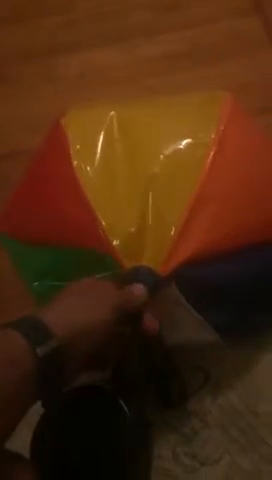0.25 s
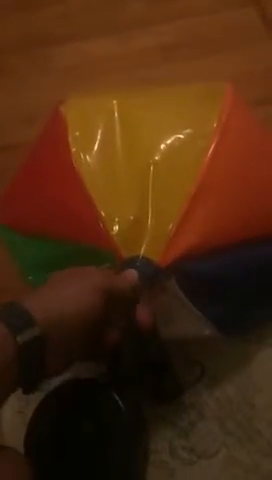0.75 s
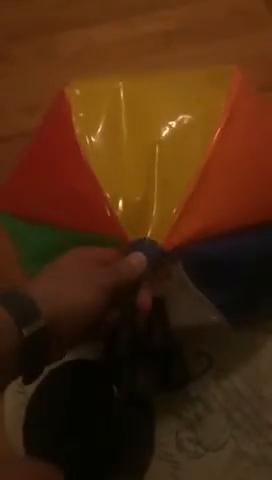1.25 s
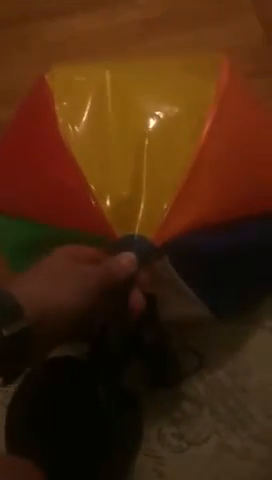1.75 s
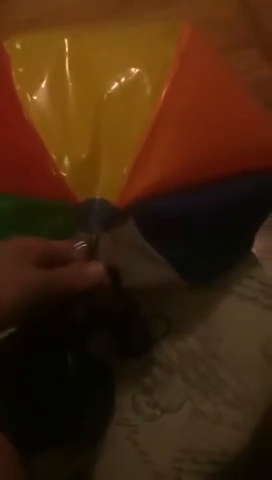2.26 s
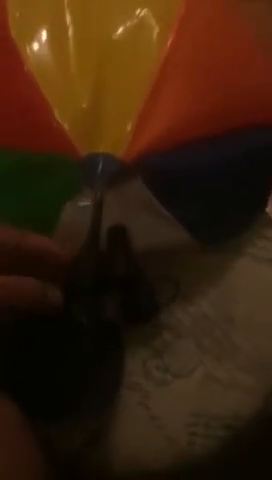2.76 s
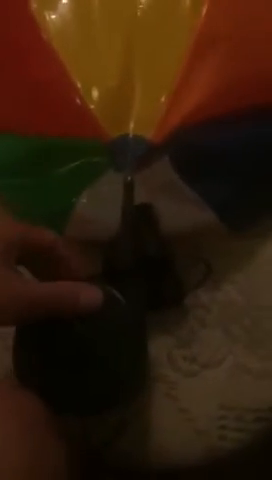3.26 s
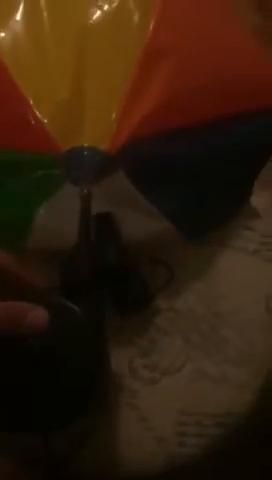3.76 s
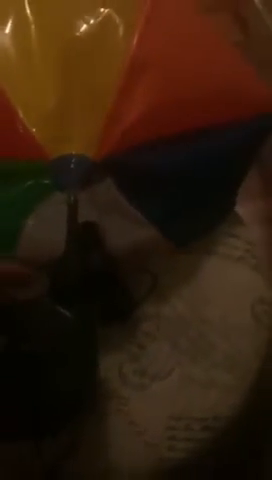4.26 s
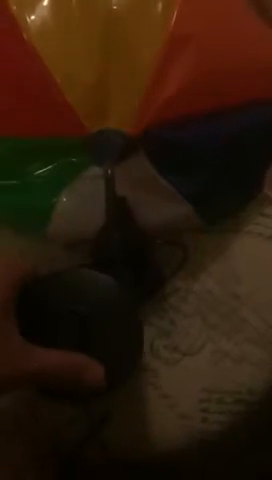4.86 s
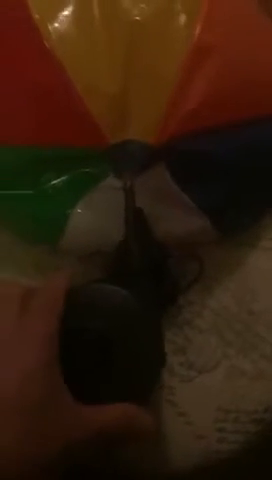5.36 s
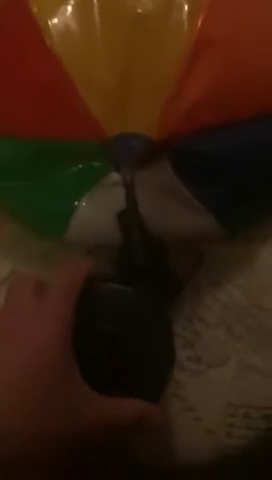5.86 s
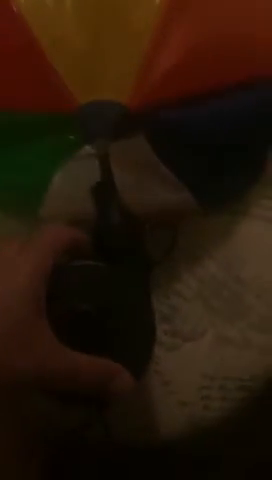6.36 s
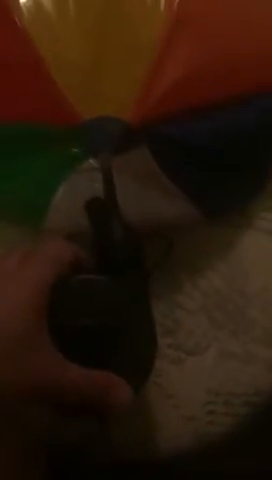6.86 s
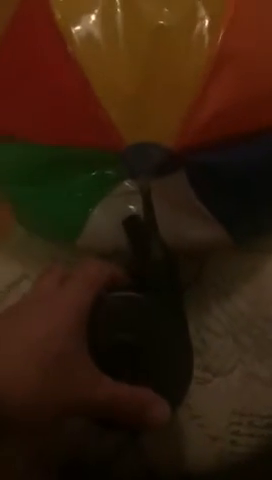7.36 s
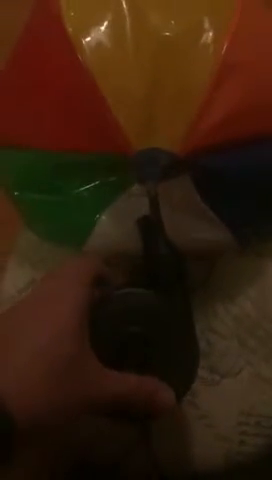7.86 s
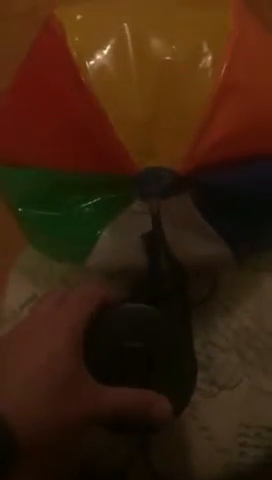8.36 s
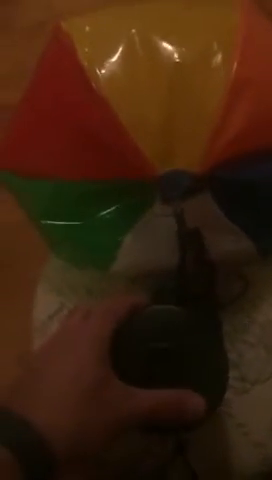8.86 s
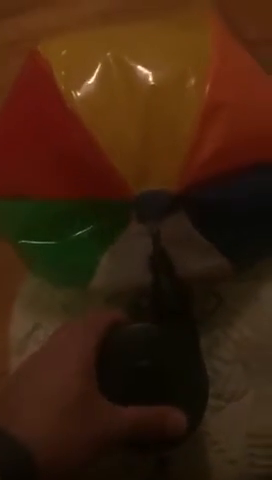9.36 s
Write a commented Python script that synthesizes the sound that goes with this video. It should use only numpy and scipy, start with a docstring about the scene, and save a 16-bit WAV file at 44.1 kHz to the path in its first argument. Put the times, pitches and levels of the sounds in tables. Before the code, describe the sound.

An electric air pump runs from the start, close by in a quiet room, inflating a beach ball. A steady, slightly hollow rush of air and hiss carries a motor hum and a piercing high whine that wavers in loudness. From about 5.5 seconds a hand rubs the case, with several dull bumps between 6.1 and 7.1 seconds. At about 6.8 seconds the pump cuts out and coasts down: the whine glides lower, the air fades, and the case briefly shudders against the floor. Faint falling chirps, a soft scrape and a low groan follow as the rotor slows, becoming very quiet by 9 seconds. At about 9.4 seconds the switch snaps on with a loud, slightly distorted plastic crack, and the motor hums and spins up, its pitch and the rush of air rising.

```python
"""A mains air pump blows up a vinyl beach ball, its 15-blade impeller whining over the rush of air
in the housing. It stands on the floor of a quiet room, with one microphone close by.
A hand grips the pump and switches it off; the rotor coasts down, shaking the case, chirping and
groaning as it slows. The switch snaps on again, overloading the recorder; the motor hums and spins up."""
import sys
import numpy as np
from scipy import signal
from scipy.fft import rfft, irfft
from scipy.io import wavfile
from scipy.ndimage import uniform_filter1d

SR = 44100
rng = np.random.default_rng(int(sys.argv[2]) if len(sys.argv) > 2 else 0)


def unload_wav(signal):
    """Save mono or channel-first audio to the path in sys.argv[1] as 16-bit WAV at rate SR, clipped to [-1, 1]."""
    wavfile.write(
        sys.argv[1],
        SR,
        np.round(np.clip(np.atleast_2d(signal).T, -1, 1) * 32767).astype(np.int16),
    )


N = 423801
TIME = np.arange(N) / SR
FREQS = np.maximum(np.arange(N // 2 + 1) * SR / N, 1)
OFF_S, ON_S = 6.755, 9.361
BLADES, MAINS_HZ = 15, 60

# spectrum of the quiet room: freq_hz, level_db
ROOM_SPECTRUM = [(18, -36.5), (30, -5.5), (71, 0.5), (175, -10), (270, -1.5), (326, -14), (1500, -13.5),
                 (1730, -15), (7990, -24.5), (9000, -21.5), (11700, -54.5), (19800, -120)]
# the palm rubbing the case: start_s, end_s, level_db
PALM_RUBS = [(5.45, 6.0, -59), (6.12, 6.578, -47), (6.65, 7.15, -48.5), (7.15, 7.65, -55), (7.65, 8.3, -67)]
# the hand bumping the case: start_s, level_db
HAND_BUMPS = [(1.219, -36), (3.529, -40), (5.668, -42), (6.132, -29), (6.239, -25), (6.390, -21),
              (6.502, -23), (6.534, -30), (6.676, -36), (6.796, -17.5), (6.878, -42), (6.964, -28),
              (7.099, -27), (7.325, -40), (7.405, -41), (7.548, -37), (7.612, -45), (9.169, -53),
              (9.222, -59), (9.358, -29.5)]
# thud of the case on the floor: pitch_hz, level_db, t60_s
THUD_MODES = [(55, -9, .1), (88, -1.5, 0.073), (140, -6.5, 0.061), (227, -3, .05), (330, -15.5, .04),
              (580, -6.5, .035)]
# the rocker switch is touched, snaps over and bounces: start_s, level_db
SWITCH_CONTACTS = [(9.168, -55), (9.3612, -0.5), (9.3628, -13), (9.3643, -11), (9.368, -18), (9.381, -24)]
# ring of the switch in the plastic case: pitch_hz, level_db, t60_s
PLASTIC_MODES = [(250, -35, 0.062), (636, -41, .03), (1090, -34, 0.033), (1320, -26, 0.017),
                 (1510, -21.5, 0.021), (2600, -27, 0.0075), (3360, -17, 0.01), (3860, -11.5, 0.0096),
                 (4600, -13, 0.01), (5500, -13, 0.01), (6300, -14, 0.018), (7000, -14, 0.009),
                 (8250, -21, 0.0065)]

# case modes rung by the slow rotor: pitch_hz, half_width_hz, level_db, best_turns_per_s, spread_octaves
DRONE_MODES = [(1120, 55, -63, 46, .5), (560, 40, -62.5, 50, .4), (2680, 130, -68.5, 80, 0.55),
               (1095, 120, -48.5, 91, .72), (724, 200, -45.5, 111, 0.79), (2680, 120, -46.5, 210, .35),
               (1270, 35, -41, 192, 0.22)]
# resonances of the motor's frame: centre_hz, width_hz, gain_db
FRAME_PEAKS = [(2680, 350, 9.5), (4195, 750, 21.5), (5110, 380, 15)]
# high rotor partials that chirp in them: multiple, level_db
CHIRP_PARTIALS = [(30, -49.5), (48, -61), (50, -55.5), (60, -56), (70, -54), (78, -62)]
# how the case on the floor answers the unbalance: turns_per_s, gain_db
SHAKE_BY_SPEED = [(45, -51.5), (68, -35), (82, -15), (112, -9.5), (136, -6), (166, 7.5), (180, 9),
                  (192, 0.5), (212, 9.5), (240, -1), (265, -11), (317, -10.5), (357, 0)]
# the once-a-turn hum under power: time_s, level_db
SHAKE_LEVEL = [(0.0, -36.5), (0.6, -38), (1.71, -31.5), (2.46, -35.5), (3.4, -36.5), (5.22, -33.5),
               (6.71, -39.5), (6.75, -34.5)]
# rotor partials of the motor: multiple, level_db, mains_throb_depth
MOTOR_PARTIALS = [(2, -38.5, .1), (4, -39, .3), (6, -39, 0.6), (7, -46, .9), (8, -42, 1), (10, -48.5, 0.7),
                  (12, -48, 0.5)]
# tones twice the mains rate off a partial: multiple, side (-1 below, +1 above), level_db
MAINS_SIDEBANDS = [(9, -1, -48), (10, 1, -49)]
# the ninth partial comes and goes as hand and pump move: time_s, level_db
NINTH_LEVEL = [(0.0, -39.5), (0.45, -43.5), (1.14, -38.5), (1.45, -42), (1.75, -37), (1.9, -41),
               (2.82, -40), (3.16, -47.5), (3.65, -46), (4.1, -40.5), (4.14, -50), (4.49, -35.5),
               (4.53, -42.5), (4.87, -35), (5.0, -34), (5.12, -41.5), (5.19, -34.5), (5.29, -35.5),
               (5.35, -39), (6.75, -40.5)]

# spectrum of the turbulence: freq_hz, level_db
AIR_SPECTRUM = [(25, -46.5), (60, -31), (185, -22.5), (250, -10), (420, -10.5), (750, -6), (1050, -2.5),
                (1550, -2.5), (1900, -5.5), (3600, -6), (5750, -6.5), (6900, -6), (7700, -13), (8900, -23),
                (9350, -41.5)]
# resonances and one notch of the housing: centre_hz, width_hz, gain_db
HOUSING_PEAKS = [(287.7, 70, 5), (368, 50, 3), (471, 33, 4), (543, 83, 8.5), (594.4, 40, 7), (631, 40, 6.5),
                 (998, 76, 2), (1213, 62, 2), (2741, 190, 8.5), (4450, 600, 3.5), (4870, 300, -9),
                 (5660, 670, 4), (8690, 870, 8.5)]
# air noise falls with rotor speed, the hiss fastest: turns_per_s, rush_db, hiss_db
AIR_GAINS = [(8, -59.5, -66.5), (24.97, -48, -66), (56.3, -39, -59), (98.7, -18, -35), (186, -5, -14.5),
             (266, -2, -5.5), (353, 0, 0)]
# the rush under power: time_s, level_db
POWERED_RUSH = [(0.05, -24.5), (1.92, -24), (2.79, -23.5), (3.25, -24), (3.81, -23), (3.85, -23.5),
                (4.25, -24), (4.42, -24.5), (4.6, -24), (5.46, -25), (6.2, -23.5), (6.7, -25)]
# the hiss under power: time_s, level_db
POWERED_HISS = [(0.0, -30), (2.58, -30), (2.68, -25.5), (2.9, -27), (3.03, -26.5), (3.35, -29), (4.33, -30),
                (4.5, -29), (5.5, -28), (5.65, -29), (5.9, -28), (6.7, -28)]
# the hollow cavity resonance swells and sinks: time_s, level_db
CAVITY_SWELL = [(0.0, -28), (0.55, -24.5), (0.8, -28), (1.15, -23.5), (1.45, -26), (1.56, -31), (1.73, -25),
                (1.93, -30), (2.3, -25), (3.2, -25), (3.34, -29.5), (3.48, -26), (4.75, -24), (4.95, -28.5),
                (5.2, -26), (5.6, -24), (6.05, -24), (6.72, -24), (7.0, -28.5)]
# the upper rush, lifted while the hand is off the nozzle: time_s, gain_db
NOZZLE_LIFT = [(1.9, 0.5), (2.2, 3), (2.9, 2.5), (3.25, -0.7), (3.7, 0.5), (3.95, -1.3)]
# the outlet resonance, brought out as the hand closes round the case: time_s, gain_db
GRIP_LIFT = [(1.9, -0.3), (3.2, -0.1), (4.2, 1.5), (4.35, -2), (4.48, 5), (4.92, 5), (5.02, 3), (5.6, 2.5),
             (6.5, 4)]
# the narrow resonance near 2750 Hz: time_s, gain_db
NARROW_LIFT = [(0.1, 2.5), (1.4, 2.5), (1.7, -4), (1.8, 4.5), (1.98, 0), (2.6, -.7), (3.55, 1), (3.8, 2.5),
               (4.26, 3.5), (4.42, -2), (5.05, -0.5), (5.35, 2), (5.52, -2.7), (5.8, -3.5), (6.15, 0),
               (6.75, 0), (7.3, 2.5), (7.75, -2)]
# the top of the hiss: time_s, gain_db
HISS_LIFT = [(0.3, -1), (1.25, -1.5), (2.2, 1.5), (2.8, 0.5), (3.05, -1), (3.4, 0), (4.35, 1), (4.55, 2.3),
             (5.05, 2.3), (5.4, .3), (5.97, 1), (6.7, -0.5)]
# outlet resonances that the whine glides through: centre_hz, width_hz, gain_db
OUTLET_PEAKS = [(2670, 220, 16.5), (3984, 440, 20), (4460, 690, 22), (5220, 730, 20)]
# the blade-passing tone under power: time_s, pitch_hz, level_db
BLADE_TONE = [(0.0, 5350, -25), (0.58, 5356, -23.5), (2.08, 5354, -23.5), (2.15, 5352, -29.5),
              (2.24, 5354, -24), (2.33, 5355, -26.5), (2.39, 5356, -32.5), (2.58, 5356, -33.5),
              (2.7, 5356, -23.5), (2.84, 5354, -26), (3.03, 5352, -19.5), (3.22, 5352, -20),
              (3.38, 5354, -23.5), (3.89, 5360, -26), (3.93, 5358, -21), (4.38, 5361, -27.5),
              (4.47, 5358, -22.5), (4.95, 5359, -25.5), (5.08, 5360, -30), (5.2, 5357, -24),
              (5.7, 5353, -26), (5.77, 5354, -23), (6.75, 5351, -23)]


def from_db(db):
    """Decibels to gain."""
    return np.exp(np.asarray(db) * np.log(10) / 20)


def unit_rms(x):
    """Scale to unit power."""
    return x / np.sqrt(np.mean(x ** 2) + 1e-20)


def in_time(rows):
    """Each column of a curve at every sample."""
    times, *columns = np.transpose(rows)
    return [np.interp(TIME, times, column) for column in columns]


def at_hz(points, hz):
    """Read a curve on a log-frequency axis."""
    freqs, values = np.transpose(points)
    return np.interp(np.log(hz), np.log(freqs), values)


def peaks_db(resonances, hz):
    """Colour that a set of resonances gives to a sound inside it."""
    return sum(db / (1 + (2 * (hz - centre) / width) ** 2) ** 2 for centre, width, db in resonances)


def rolloff(ratio, power):
    """Gain of 1 at ratio 0 and a half at ratio 1, falling more steeply for a higher power."""
    return 1 / (1 + ratio ** power)


def drift(rate_hz, hop=40):
    """Smooth random wander of spread 1."""
    pole = np.exp(-2 * np.pi * hop * rate_hz / SR)
    white = rng.standard_normal(N // hop + 3002)
    slow = unit_rms(signal.lfilter([1], [1, -2 * pole, pole * pole], white)[3000:])
    return np.interp(np.arange(N) / hop, np.arange(len(slow)), slow)


def noise(shape):
    """Unit-power noise with the given spectral shape."""
    return unit_rms(irfft(rfft(rng.standard_normal(N)) * shape, N))


def lift(x, curve, centre_hz, width_hz):
    """Raise and lower one band along a curve."""
    band = irfft(rfft(x) * np.exp(-((FREQS - centre_hz) / width_hz) ** 4), N)
    return x + (from_db(in_time(curve)[0]) - 1) * band


def partial(turns, multiple, wander_db, rough):
    """One harmonic of a rotation, swaying in level and roughened in phase and level."""
    phase = 2 * np.pi * (multiple * turns + rng.random()) + rough * drift(35)
    return np.sqrt(2) * np.sin(phase) * from_db(wander_db * drift(5.7) + 9.5 * rough * drift(35))


def decays(hits, gain_db, decay_s):
    """An envelope that jumps at each hit and dies away."""
    start_s, db = np.transpose(hits)
    impulses = np.bincount((start_s * SR).astype(int), from_db(db + gain_db), N) + 1e-18
    return signal.lfilter([1], [1, -np.exp(-1 / (decay_s * SR))], impulses)


def strike(hits, modes, spread_db=2):
    """Each hit sets every mode ringing with a strength of its own."""
    start_s, hit_db = np.transpose(hits)
    scatter_db = spread_db * rng.standard_normal((len(hits), len(modes)))
    out = np.zeros(N)
    for k, (hz, db, t60) in enumerate(modes):
        clicks = np.full(N, 1e-18)
        clicks[(start_s * SR).astype(int)] = from_db(hit_db + db + scatter_db[:, k])
        pole, angle = np.exp(-np.log(1000) / (t60 * SR)), 2 * np.pi * hz / SR
        feedback = [1, -2 * pole * np.cos(angle), pole * pole]
        out += (-1) ** k * signal.lfilter([0, np.sin(angle)], feedback, clicks)
    return out


def room_tone(level_db=-71):
    """The faint steady noise of the room."""
    return from_db(level_db) * noise(from_db(at_hz(ROOM_SPECTRUM, FREQS)))


def reverb(x, wet_db, t60_s=0.32):
    """Add a short diffuse tail from floor and walls."""
    age = TIME[:SR // 2]
    tail = rng.standard_normal(len(age)) * np.exp(-np.log(1000) * age / t60_s) * (age > .003)
    return x + from_db(wet_db) * signal.fftconvolve(x, tail / np.sqrt(np.sum(tail ** 2)))[:N]


def reflections(x, echo_db=-22, sway_s=.00008, count=4):
    """Floor, ball and hand echo the treble to the microphone, by paths that change as things move."""
    treble = signal.sosfilt(signal.butter(2, 1700, "high", fs=SR, output="sos"), x)
    for delay_s in rng.uniform(.002, .014, count):
        late = np.round((TIME - delay_s - sway_s * drift(0.3)) * SR).astype(int)
        x = x + from_db(echo_db) * treble[np.clip(late, 0, N - 1)] * (late >= 0)
    return x / np.sqrt(1 + count * from_db(2 * echo_db))


def handling(low_hz=55, high_hz=130):
    """The palm rubs the case with an uneven low rumble; each bump is a thud with a short scuff."""
    rubs = sum(from_db(db) * ((TIME > start) & (TIME < end)) for start, end, db in PALM_RUBS)
    rubs = uniform_filter1d(rubs, size=2000) * from_db(5 * drift(11))
    scuffs = uniform_filter1d(decays(HAND_BUMPS, gain_db=-10, decay_s=.014), size=300)
    rumble = noise(np.sqrt(rolloff(low_hz / FREQS, 6) * rolloff(FREQS / high_hz, 6)))
    return (rubs + scuffs) * rumble + strike(HAND_BUMPS, THUD_MODES)


def rocker_switch():
    """Each contact of the switch gives a short bright crack and rings the plastic case."""
    burst = decays(SWITCH_CONTACTS, gain_db=-17, decay_s=.0021) * rng.standard_normal(N)
    crack = signal.sosfilt(signal.butter(2, [1700, 6300], "band", fs=SR, output="sos"), burst)
    ring = strike(SWITCH_CONTACTS, PLASTIC_MODES)
    return from_db(0.5) * (reverb(ring, wet_db=-22) + reverb(crack, wet_db=-8))


def rotor_speed(friction=80.5, bearing_drag=.252, air_drag=.001302, spin_up_s=0.335):
    """Turns per second: steady under power, braked by friction and drag once off, then rising again."""
    running = in_time(BLADE_TONE)[0] / BLADES
    falling, step = np.linspace(running[-1], 0, num=2000, retstep=True)
    braking = friction + bearing_drag * falling + air_drag * falling ** 2
    reached_s = OFF_S - np.cumsum(step / braking)
    coasting = np.interp(TIME, reached_s, falling)
    starting = running[-1] * (1 - np.exp(-np.maximum(TIME - ON_S, 0) / spin_up_s))
    return np.maximum(np.select([TIME < OFF_S, TIME < ON_S], [running, coasting], starting), 1)


def bearing_groan(speed, pitch_hz=348, best_speed=68, spread_octaves=0.36):
    """At low speed a bearing groans on one note, which sinks slightly as the rotor slows."""
    cycles = np.cumsum(pitch_hz * (speed / best_speed) ** .14) / SR
    swell = rolloff(np.log2(speed / best_speed) / spread_octaves, 12)
    return from_db(-58) * swell * partial(cycles, 1, wander_db=-1, rough=.35)


def case_drone(speed):
    """The rotor rings the modes of the case, each over its own range of speed."""
    out = 0
    for hz, half_width, db, best_speed, octaves in DRONE_MODES:
        swell = rolloff(np.log2(speed / best_speed) / octaves, 6)
        out += from_db(db) * swell * noise(rolloff((FREQS - hz) / half_width, 2))
    return out


def chirps_and_scrape(speed, turns, fade_speed=152, starting_db=8):
    """At low speed high partials chirp across the frame's resonances, over softly scraping brushes."""
    share, jitter = speed / speed[0], .3 * drift(35)
    frame = from_db(peaks_db(FRAME_PEAKS, FREQS))
    radiated = frame * rolloff(FREQS / 6200, 12)
    tones = 0
    for multiple, db in CHIRP_PARTIALS:
        gain = from_db(db) * np.interp(multiple * speed, FREQS, radiated)
        tones += gain * np.sqrt(2) * np.sin(2 * np.pi * multiple * turns + jitter)
    # the chirps throb with the mains when starting, otherwise once a turn
    beats = np.where(TIME > ON_S, 2 * MAINS_HZ * TIME, turns)
    throb = 1 + .6 * np.cos(2 * np.pi * beats)
    chirps = tones * share ** 1.84 * rolloff(speed / fade_speed, 20) * throb
    scrape = from_db(-59) * share ** .76 * noise(np.sqrt(frame * rolloff(FREQS / 4900, 12)))
    return (chirps + scrape) * from_db(starting_db * (TIME > ON_S))


def inrush(hum_fade_s=0.3, fizz_fade_s=0.2):
    """The starting current briefly makes the iron hum at twice the mains rate and the brushes fizz."""
    age = np.maximum(TIME - ON_S, 0)
    phase = 2 * np.pi * 2 * MAINS_HZ * age
    hum = sum(from_db(db) * np.sin(k * phase) for k, db in enumerate([0, -13, -11], 1))
    fizz = noise(from_db(at_hz(AIR_SPECTRUM, FREQS)) * FREQS / (FREQS + 2500)) * (age > 0)
    return from_db(-44) * (np.exp(-age / hum_fade_s) * hum + np.exp(-age / fizz_fade_s) * fizz)


def shake(speed, turns):
    """Unbalance shakes the case once a turn, hardest near half speed where it resonates on the floor."""
    free_db = -38 - 5 * (TIME > ON_S)   # spin-up passes too fast for a full swing
    drive_db = np.where(TIME < OFF_S, in_time(SHAKE_LEVEL)[0] + 0.5, free_db)
    swing = from_db(uniform_filter1d(drive_db, size=2000) + at_hz(SHAKE_BY_SPEED, speed))
    return swing * partial(turns, 1, wander_db=0.9, rough=0.036)


def motor(speed, turns):
    """Rotor partials throb with the mains until switch-off, and fade quickly as the rotor slows."""
    effort = (speed / np.max(speed)) ** 2.8
    beats, running = 2 * MAINS_HZ * TIME, TIME < OFF_S
    mains = np.cos(2 * np.pi * beats) * running
    ninth = from_db(in_time(NINTH_LEVEL)[0] + 2.5) * partial(turns, 9, wander_db=1, rough=0.16)
    out = ninth * (1 + 0.14 * mains)
    for multiple, db, throb in MOTOR_PARTIALS:
        out += from_db(db) * partial(turns, multiple, wander_db=1.5, rough=0.13) * (1 + throb * mains)
    for multiple, side, db in MAINS_SIDEBANDS:
        cycles = multiple * turns + side * beats
        out += from_db(db) * partial(cycles, 1, wander_db=1.5, rough=0.1) * running
    return effort * out


def air_levels(speed):
    """Levels in dB of rush, cavity, outlet and hiss, from the rotor speed and the hand on the case."""
    gains = np.array(AIR_GAINS)
    flow_db, jet_db = at_hz(gains[:, [0, 1]], speed), at_hz(gains[:, [0, 2]], speed)
    drop_db = -0.37 * (TIME > OFF_S)
    rush_db = in_time(POWERED_RUSH)[0] + flow_db + drop_db
    hiss_db = in_time(POWERED_HISS)[0] + jet_db + drop_db
    # the two resonances are blown hardest near full flow
    slack_db = np.maximum(flow_db, -7)
    cavity_db = in_time(CAVITY_SWELL)[0] - 1.5 + flow_db + drop_db + 0.37 * slack_db
    outlet_db = rush_db - 9 + slack_db + in_time(GRIP_LIFT)[0]
    return rush_db, cavity_db, outlet_db, hiss_db


def air_rush(speed, turns, cavity_hz=585, outlet_hz=4300):
    """Turbulence in the housing: roar, rush, two broad resonances and a hiss that dies as flow drops."""
    rush_db, cavity_db, outlet_db, hiss_db = air_levels(speed)
    colour = from_db(at_hz(AIR_SPECTRUM, FREQS) + peaks_db(HOUSING_PEAKS, FREQS))
    deep, low = rolloff(FREQS / 330, 12), rolloff(FREQS / 1720, 16)
    upper, high = rolloff(1300 / FREQS, 12), rolloff(outlet_hz / FREQS, 12)
    cavity = np.exp(-((FREQS - cavity_hz) / 105) ** 4)
    outlet = np.exp(-((FREQS - outlet_hz) / 420) ** 2)

    def band(db, share):
        """One share of the turbulence at its own level."""
        return from_db(db) * noise(colour * np.sqrt(share))

    # the deep roar needs a strong flow and fades early
    roar = band(rush_db - 14 + 0.25 * (rush_db - np.median(rush_db)), deep)
    body = roar + band(rush_db - 2, (1 - upper) * (1 - cavity) * (1 - deep))
    body += band(cavity_db + 0.84 * drift(16), cavity)
    body += band(rush_db - 4 + in_time(NOZZLE_LIFT)[0], low * upper)
    middle = band(0.7 * rush_db + 0.3 * hiss_db - 2, (1 - low) * (1 - high) * (1 - outlet))
    middle = lift(middle, NARROW_LIFT, centre_hz=2740, width_hz=180)
    middle += band(outlet_db, outlet)
    hiss = lift(band(hiss_db + 1.5, high * (1 - outlet)), HISS_LIFT, centre_hz=7700, width_hz=1100)
    # the uneven impeller chops the flow a little on every turn
    chop = 1 + 0.175 * sum(np.cos(2 * np.pi * k * turns) for k in (1, 2, 3))
    return body * from_db(0.77 * drift(25)) + middle * chop + hiss * from_db(1.1 * drift(22))


def impeller_whine(speed, turns, stall_hz=1900):
    """Blades pass the outlet with a piercing tone that swells and dips gliding through its resonances."""
    pitch_hz = BLADES * speed
    outlet_db = peaks_db(OUTLET_PEAKS, pitch_hz)
    db = in_time(BLADE_TONE)[1] + 0.4 + outlet_db - outlet_db[0] - 3 * (TIME > OFF_S)
    flow = (speed / speed[0]) ** 1.5 * rolloff(stall_hz / pitch_hz, 4)
    return from_db(db) * flow * partial(turns, BLADES, wander_db=0.7, rough=.065)


def scene():
    """Pump, room, hand and switch at one close microphone, the same in both channels."""
    speed = rotor_speed()
    turns = np.cumsum(speed) / SR
    pump = reflections(air_rush(speed, turns)) + case_drone(speed) + bearing_groan(speed) + inrush()
    pump += sum(source(speed, turns) for source in (motor, impeller_whine, chirps_and_scrape, shake))
    return np.tile(pump + room_tone() + handling() + rocker_switch(), (2, 1))


def record(dry):
    """The snap of the switch overloads the recorder; the top is cut steeply at 9350 Hz."""
    lowpass = signal.ellip(12, .1, 90, 9350, fs=SR, output="sos")
    return signal.sosfilt(lowpass, np.clip(dry, -.5, .5))


dry = scene()
out = record(dry)
unload_wav(out)
```